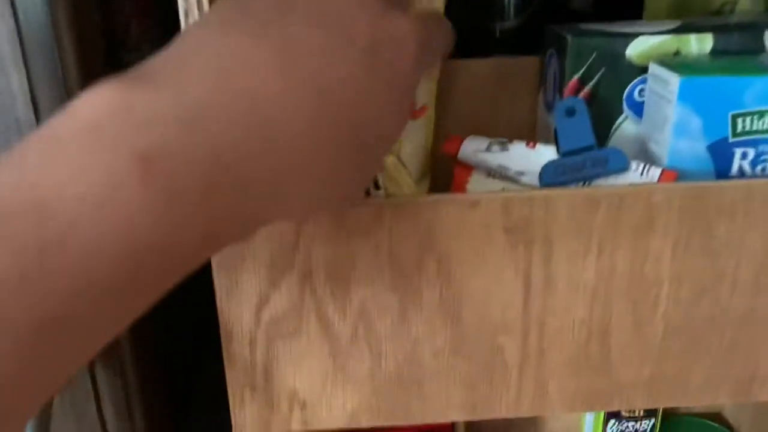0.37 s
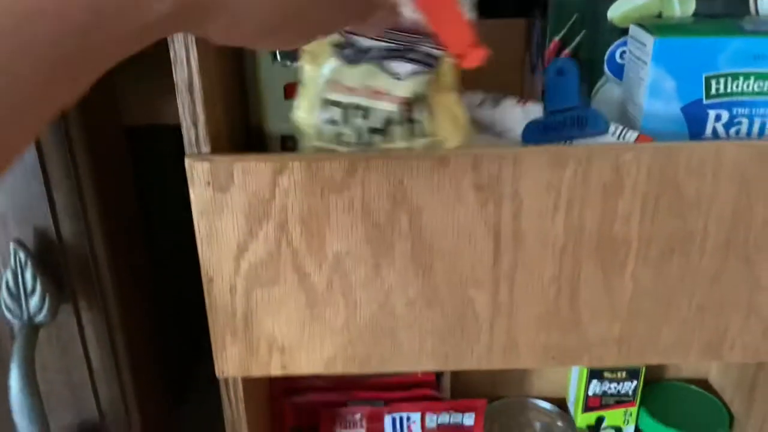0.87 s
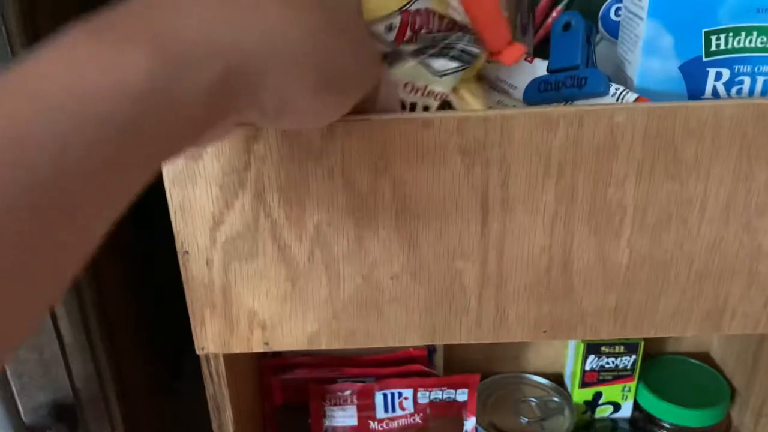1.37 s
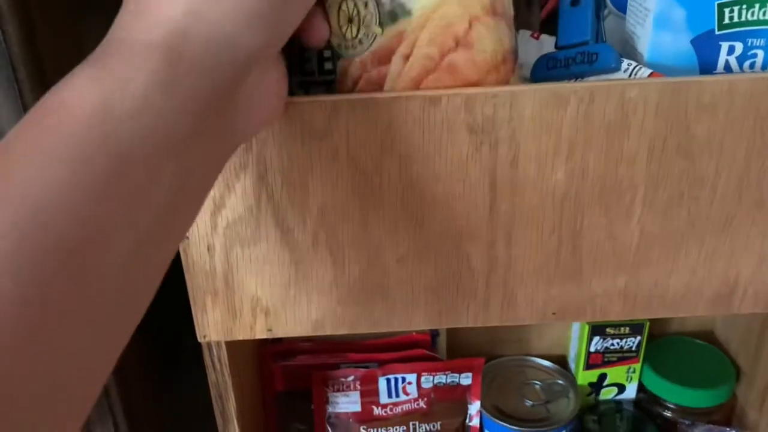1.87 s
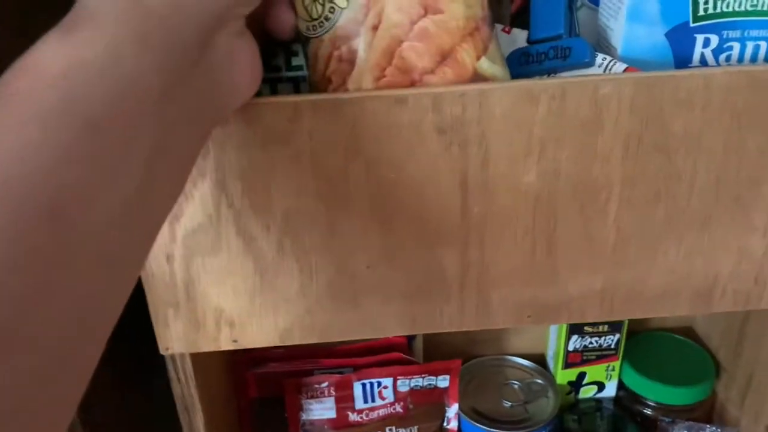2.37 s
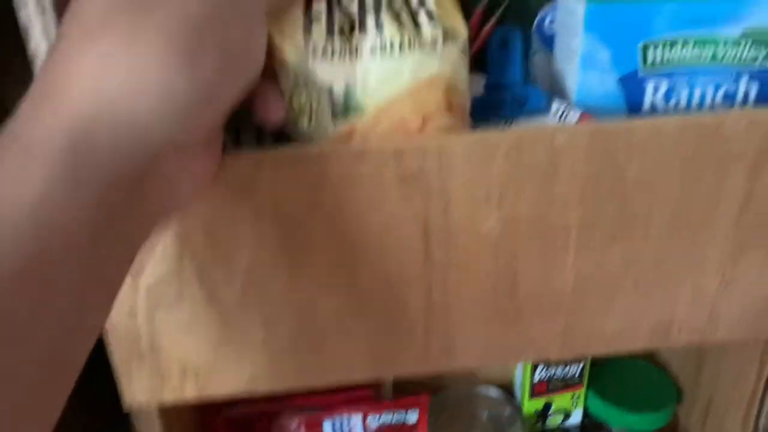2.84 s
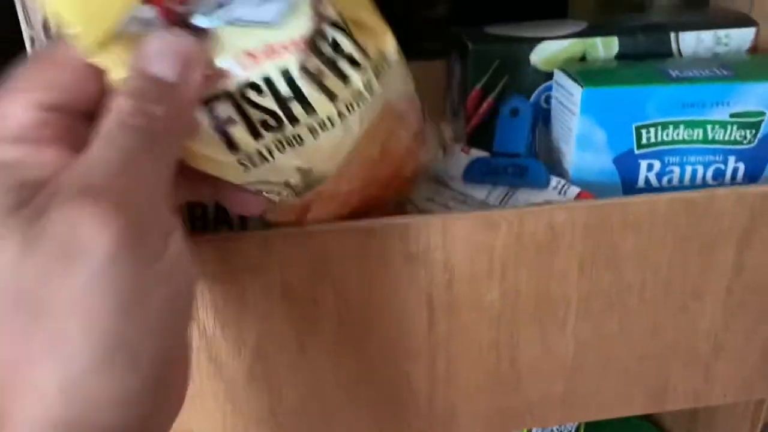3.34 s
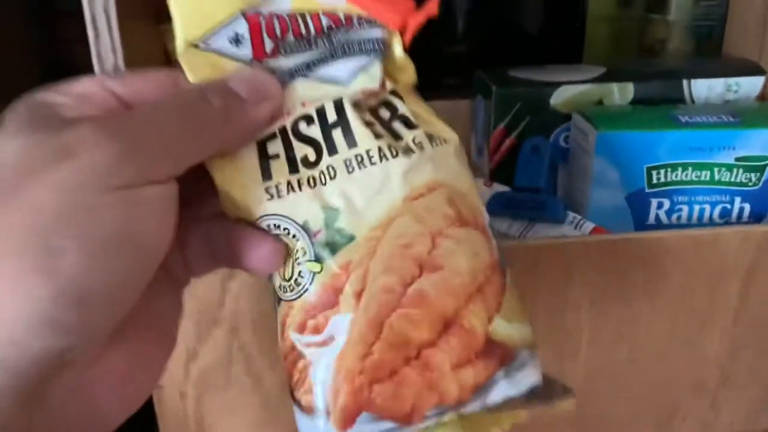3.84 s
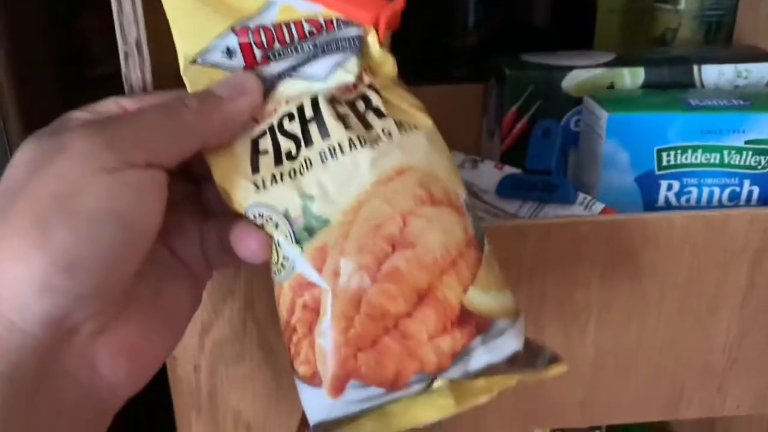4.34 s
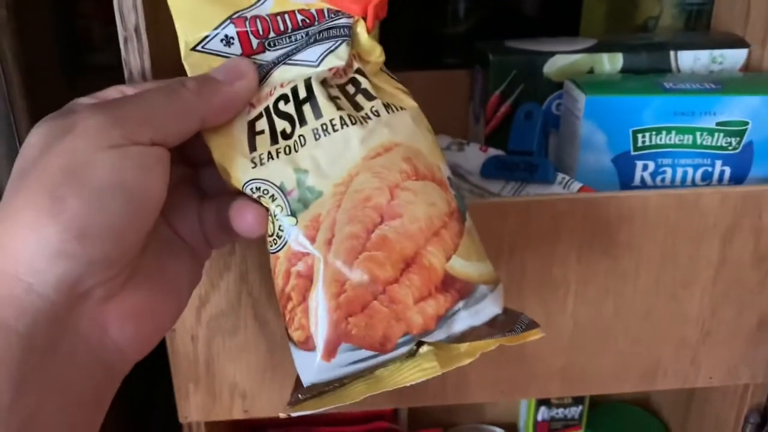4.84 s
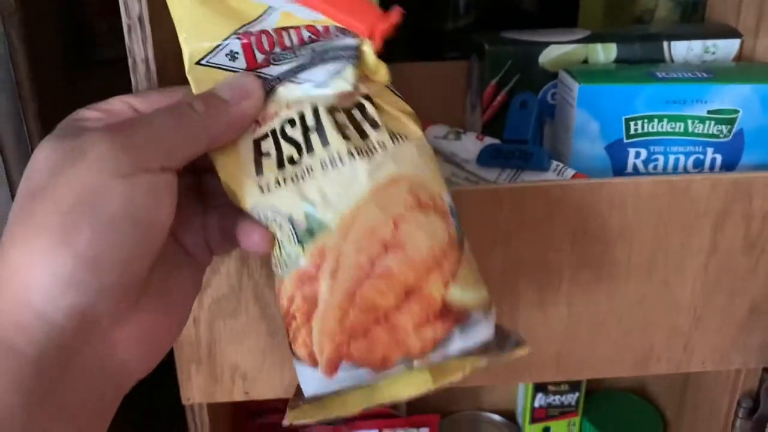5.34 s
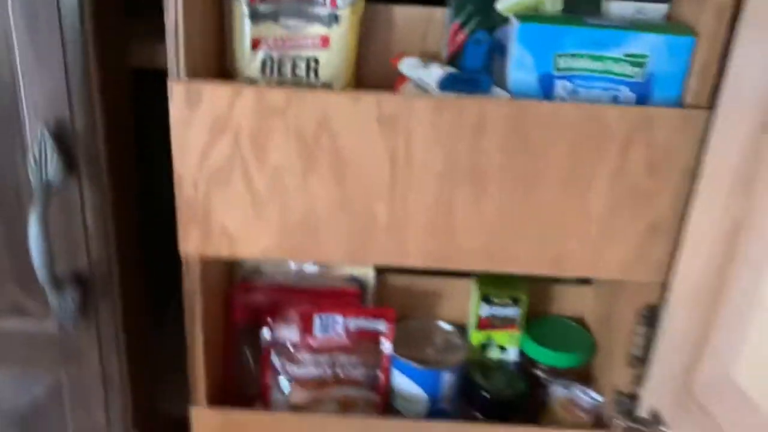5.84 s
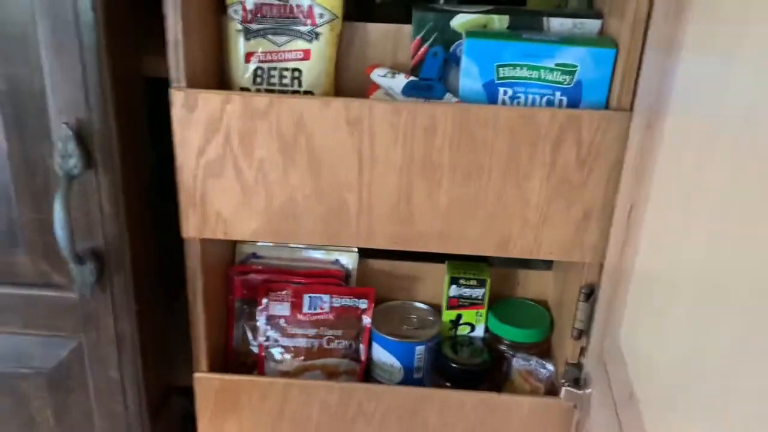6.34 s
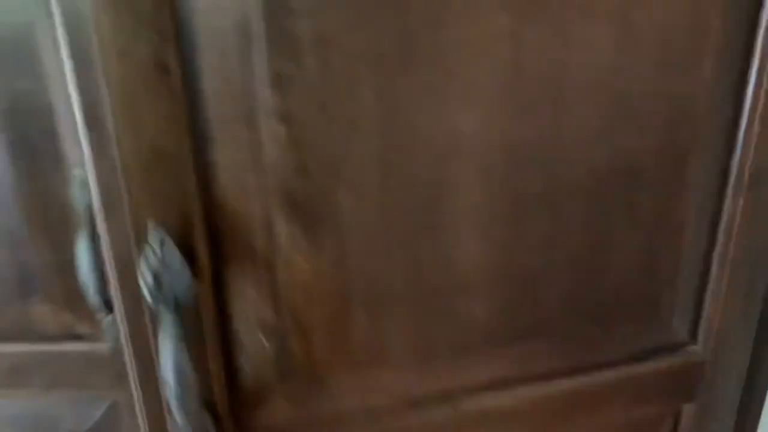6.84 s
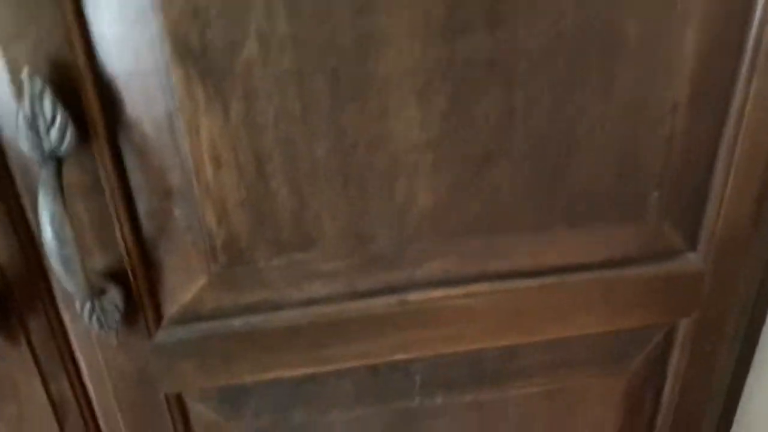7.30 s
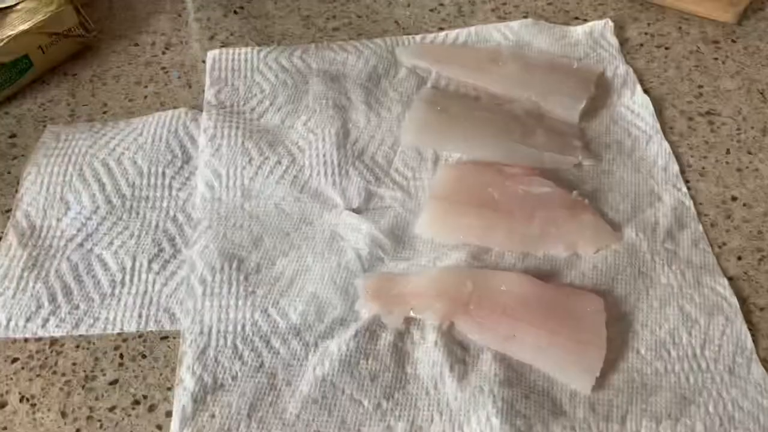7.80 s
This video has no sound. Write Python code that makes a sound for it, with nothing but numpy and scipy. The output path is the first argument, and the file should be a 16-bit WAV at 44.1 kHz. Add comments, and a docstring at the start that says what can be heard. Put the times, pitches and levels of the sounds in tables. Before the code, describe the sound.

Close stereo microphone in a small, fairly dry kitchen: dense bright crinkling of a filled packet with low hollow wood knocks and dull bumps, easing briefly, then resuming up to one loud clunk. The packet is held almost silently, rustles again as it is carried off, and a wooden door slams sharply, followed by faint handling and a drop in level.

```python
"""A hand pulls a stiff plastic food packet out of a wooden door rack in a home kitchen: the film crackles and snaps,
packet and boxes bump, and the hollow rack knocks and sways. The packet is lifted clear, turned and carried off.
Near the end the door catch rattles, the cupboard door bangs shut and shudders; last of all the level drops.
Film and wood are made from ringing clicks and shaped noise; two close microphone ports hear them."""
import sys
import numpy as np
from scipy import signal
from scipy.fft import rfft, irfft
from scipy.io import wavfile

SR = 44100
rng = np.random.default_rng(int(sys.argv[2]) if len(sys.argv) > 2 else 0)


def unload_audio(sound):
    """Save the sound as a 16-bit wav file, at the path given as the first command line argument."""
    columns = np.transpose(np.atleast_2d(sound))
    # keep every value between -1 and 1, then stretch to whole-number steps
    steps = np.round(np.clip(columns, -1, 1) * 32767)
    wavfile.write(sys.argv[1], SR, steps.astype(np.int16))


def amplitude_ratio(level_db):
    """Convert a level in decibels to the matching linear amplitude (field) ratio."""
    exponent = np.asarray(level_db, float) / 20
    return 10 ** exponent


N = 349983


def rms_one(x):
    """Scale a sound to an average (rms) strength of 1."""
    return x / np.sqrt(np.mean(x ** 2) + 1e-20)


def at_hz(points, hz):
    """Read a curve of (f/Hz, value) between its points, on a logarithmic pitch scale."""
    f, value = np.array(points).T
    return np.interp(np.log(hz + 1), np.log(f), value)


def colour(x, points):
    """Shape a steady signal by a dB spectrum."""
    gain = amplitude_ratio(at_hz(points, np.fft.rfftfreq(N, 1 / SR)))
    return irfft(rfft(x) * gain, N)


def drift(rate_hz):
    """Slow random wandering with spread 1, made by smoothing noise twice."""
    r = np.exp(-2 * np.pi * rate_hz / SR)
    settling = 9000   # samples thrown away while the filter starts up
    wander = signal.lfilter([1], [1, -2 * r, r * r], rng.standard_normal(N + settling))
    return rms_one(wander[settling:])


def ring(clicks, hz, t60):
    """Each unit click starts a sine of height 1 that dies by 60 dB in t60 seconds."""
    r, w = amplitude_ratio(-60 / (t60 * SR)), 2 * np.pi * hz / SR
    return signal.lfilter([0, np.sin(w)], [1, -2 * r * np.cos(w), r * r], clicks + 1e-18)


def band(x, low_hz, high_hz):
    """Keep only the pitches between two limits."""
    sos = signal.butter(2, [low_hz, min(high_hz, .45 * SR)], "band", fs=SR, output="sos")
    return signal.sosfilt(sos, x)


def add(out, s, piece):
    """Mix a piece into out, starting at s seconds."""
    i = max(round(s * SR), 0)
    out[i:i + len(piece)] += piece[:N - i]


def humps(peak_s, rise_s, fall_s, db):
    """Gain of humps that climb and drop 20 dB in the given times (signs ignored); their powers add."""
    since = np.arange(0, N + 64, 64) / SR - peak_s[:, None]
    rise, fall = np.abs(rise_s)[:, None], np.abs(fall_s)[:, None]
    away = np.where(since < 0, -since / rise, since / fall)
    gain = np.linalg.norm(amplitude_ratio(db[:, None] - 20 * away), axis=0)
    return np.interp(np.arange(N) / 64, np.arange(len(gain)), gain)


def grains(per_s, spread_db, low_hz, high_hz, cycles, clumps):
    """Tiny buckles at random moments, in clumps, each ringing one small facet for a few cycles."""
    sizes = amplitude_ratio(spread_db * np.minimum(rng.exponential(1, N), 5)) * rng.choice([-1, 1], N)
    clicks = sizes * (rng.random(N) < per_s * clumps / SR)
    facet = rng.integers(0, 12, N)
    pitches = np.geomspace(low_hz, high_hz, 12)
    return rms_one(sum(ring(clicks * (facet == k), hz, cycles / hz) for k, hz in enumerate(pitches)))


def bursts(events, cycles, width_octaves, broad_db, broad_ms, tail_db, tail_ms, low_hz, high_hz, rise_ms, firm):
    """Each event is a short ring round its own pitch plus a broad crack with a longer, weaker tail."""
    out, t = np.zeros(N), np.arange(2600) / SR
    ms = t * 1000
    for (s, db, hz), noise in zip(events, rng.standard_normal((len(events), 2, 2600))):
        blow = noise[0] * np.exp(-t * hz / cycles)
        blow[round(rise_ms * SR / 1000)] += firm   # the contact itself, against the scuffle round it
        tone = band(blow, hz * 2 ** -width_octaves, hz * 2 ** width_octaves)
        fade = amplitude_ratio(broad_db) * np.exp(-ms / broad_ms) + amplitude_ratio(tail_db) * np.exp(-ms / tail_ms)
        crack = band(noise[1] * fade, low_hz, high_hz)
        rise = (1 - np.exp(-ms / rise_ms)) * np.cos(np.pi / 2 * t / t[-1])   # and a smooth end
        add(out, s - rise_ms / 1000, amplitude_ratio(db) * rise * (tone / np.abs(tone).max() + crack))
    return out


def background():
    """Steady kitchen air and microphone hiss: noise given a fixed spectrum."""
    # spectrum of the air and hiss: f/Hz, relative level/dB
    floor = [(18, -28.5), (30, 19.5), (179, -3), (450, -28.5), (850, -17.5), (1400, -31.5), (4190, -23),
             (7270, -32), (8740, -54.5), (10800, -34), (16000, -65)]
    floor_db = -59.5   # overall rms level
    return amplitude_ratio(floor_db) * rms_one(colour(rng.standard_normal(N), floor))


def door():
    """Contacts of catch and frame strike the door's modes (own pitches); a shudder of noise bands follows."""
    # contacts of the door shutting: t/s, peak level/dB, centre f/Hz
    slam = [(6.956, -12.5, 2410), (6.962, -6, 4770), (6.963, -0.5, 2440), (6.967, -11, 338),
            (6.97, 0.5, 1930), (6.969, -13.5, 111.4), (6.979, -16.5, 158), (6.997, -8.5, 5140),
            (7.001, -13, 496), (7.01, -12, 930), (7.113, -21, 4970)]
    # pitches at which the door rings: f/Hz, level/dB before a common cut of 35 dB, time to die 60 dB/s
    modes = [(65.4, -5, 0.35), (90.4, -20, 0.8), (192, -12.5, 0.2), (266, -19.5, 0.35), (402, -20.5, 0.57),
             (540, -18, 0.2), (1028, -18.5, 0.22), (1340, -15, 0.1), (1930, -7, 0.075), (2530, -21.5, .15)]
    # shudder of door and cupboard contents: f/Hz, starting level/dB, time to die 60 dB/s
    shudder = [(70, -30, 1.3), (176, -24.5, 0.55), (400, -24.5, 0.42), (1039, -23, 0.63),
               (2300, -23.5, 0.41)]
    bang_s, rattle_db = 6.966, 2   # start of the shudder; its unevenness
    blows, t = np.zeros(N), np.arange(1800) / SR
    for (s, db, hz), noise in zip(slam, rng.standard_normal((len(slam), 1800))):
        noise[0] += 8.0   # the contact itself
        contact = band(noise * np.exp(-t / .003), hz / 1.8, hz * 1.8)
        add(blows, s, amplitude_ratio(db) * contact / np.abs(contact).max())
    out = blows + sum(amplitude_ratio(level_db - 35) * ring(blows, hz, t60) for hz, level_db, t60 in modes)
    since = np.arange(N) / SR - bang_s
    for hz, level_db, t60 in shudder:
        noise = rms_one(band(rng.standard_normal(N), hz / 1.6, hz * 1.6))
        fading_db = level_db + rattle_db * drift(12) - 60 * np.maximum(since, 0) / t60
        out += noise * (since > 0) * amplitude_ratio(fading_db)
    return out


def sway():
    """Rack, hand and steps heave and settle: a low rumble that swells and sinks."""
    # heaves: peak t/s, time to rise or settle 20 dB/s, level/dB
    heaves = [(0.0, 0.06, -42), (0.3, 0.5, -38), (1.2, 0.42, -42), (1.999, 0.28, -43.5), (2.789, 0.13, -49),
              (3.8, 0.65, -41.5), (4.2, 0.12, -44), (5.95, 0.15, -42.5), (7.199, 0.53, -43)]
    still_db = -72   # always present
    s, settle, db = np.transpose(heaves)
    rumble = rms_one(band(rng.standard_normal(N), 50, 260)) * amplitude_ratio(2.0 * drift(12))
    return (humps(s, settle, settle, db) + amplitude_ratio(still_db)) * rumble


def rack():
    """Each knock swells through three resonances of the hollow and sets the wood ringing, never quite alike."""
    # the rack knocking on its door: t/s, level/dB, base pitch of the hollow f/Hz
    knocks = [(0.111, -14.5, 450), (0.247, -11, 440), (0.358, -12, 432), (0.648, -27.5, 400),
              (0.871, -18, 413), (1.317, -28.5, 420), (1.538, -32.5, 374), (1.651, -15.5, 440),
              (1.725, -23.5, 400), (3.28, -23.5, 400), (3.306, -23.5, 403), (3.689, -6.5, 447),
              (3.889, -24.5, 426), (4.045, -32, 399), (4.121, -23.5, 415), (4.238, -30.5, 411),
              (4.314, -39.5, 416)]
    # pitches at which the wood rings: f/Hz, relative level/dB, time to die 60 dB/s
    wood = [(76, -18, 0.45), (188, -7, 0.088), (803.8, -13, 0.2)]
    scuffle_db, scuffle_t60_s, scratch_db = -27, 0.08, 21   # uneven contact after each blow; gain of its own sound
    hollow_t60_s, longer_per_db = 0.015, 0.09   # the hollow rings longer after a gentle blow
    upper_ratio, upper_db = 1.35, -10.5   # a second, higher air mode
    wood_per_db = 0.5   # hard blows wake the wood more than the hollow
    length = SR // 2
    out, click = np.zeros(N), np.eye(1, length)[0]
    modes = np.array([amplitude_ratio(db) * band(ring(click, hz, t60), hz / 1.25, hz * 1.4) for hz, db, t60 in wood])
    scuffle_gain = amplitude_ratio(scuffle_db - 60 * np.arange(length) / SR / scuffle_t60_s)
    for s, db, hz in knocks:
        scuffle = rng.standard_normal(length) * scuffle_gain
        last_t60 = hollow_t60_s * (1 - longer_per_db * db)   # the last stage is lower and lingers

        def swell(f):
            first = ring(click + scuffle, f * 1.12, hollow_t60_s)
            second = ring(first, f * 1.03, hollow_t60_s)
            return ring(second, f * .95, last_t60)

        low, high = swell(hz), swell(hz * upper_ratio)
        hollow = low / low.max() + amplitude_ratio(upper_db) * high / high.max()
        scratch = amplitude_ratio(scratch_db) * band(scuffle, 550, 1900)
        chance_db = 3.5 * rng.standard_normal(len(wood))
        ringing = amplitude_ratio(chance_db + wood_per_db * db) @ modes
        add(out, s - .006, amplitude_ratio(db) * (hollow + scratch + ringing))
    return out


def thuds():
    """Dull heavy contacts: very short, wide rings with little crack."""
    # contacts: t/s, level/dB, centre f/Hz
    contacts = [(0.457, -23.5, 412), (1.125, -27.5, 357), (1.212, -18.5, 400), (2.78, -36, 114),
                (3.595, -22, 136), (5.903, -31.5, 136), (6.12, -29, 1040), (6.548, -36.5, 536),
                (7.308, -29.5, 265)]
    return bursts(contacts, 1.8, 0.54, broad_db=-13, broad_ms=8.0, tail_db=-23.5, tail_ms=30.0,
                  low_hz=90, high_hz=1400, rise_ms=3.1, firm=4.9)


def bumps():
    """The packet bumps boxes and wood: short middle-pitched rings with a dull scatter of noise."""
    # bumps: t/s, level/dB, centre f/Hz
    contacts = [(0.221, -17.5, 1210), (0.29, -16.5, 1170), (0.955, -20, 1250), (1.043, -23.5, 1670),
                (1.182, -15, 1060), (1.611, -24, 1680), (1.931, -16, 1250), (1.948, -13, 1040),
                (2.027, -11.5, 1410), (2.042, -13.5, 1010), (2.085, -23.5, 740), (2.117, -17, 1190),
                (2.475, -35, 592), (2.476, -26.5, 1440), (2.638, -38, 600), (2.646, -31.5, 1070),
                (2.83, -30, 800), (2.855, -33.5, 850), (2.969, -21, 830), (3.055, -17.5, 2150),
                (3.074, -20, 2130), (3.252, -14, 810), (3.272, -19.5, 1122), (3.431, -30, 656),
                (3.565, -21.5, 1110), (3.585, -10.5, 1100), (3.689, -12, 875), (5.652, -23, 1620),
                (5.832, -23, 1070), (5.969, -17, 1710), (7.635, -44, 853), (7.801, -34.5, 1220)]
    return bursts(contacts, 7.3, 0.25, broad_db=-5.0, broad_ms=9.5, tail_db=-14, tail_ms=30.0,
                  low_hz=230, high_hz=2000, rise_ms=2.2, firm=6.0)


def snaps():
    """Creases in the film snap over: a sharp ring with a bright, very brief crack."""
    # snapping creases: t/s, level/dB, centre f/Hz
    creases = [(0.2364, -17, 6760), (0.2892, -16.5, 4930), (0.401, -20, 6560), (0.4233, -20, 4900),
               (0.5067, -24.5, 4430), (0.5889, -22, 6500), (0.627, -14, 4460), (0.853, -20, 11200),
               (0.8869, -17, 7700), (0.9393, -11.5, 10400), (1.071, -17.5, 7200), (1.1169, -19, 10300),
               (1.158, -16.5, 11000), (1.2186, -18, 4100), (1.5838, -18, 10600), (1.7744, -16, 4470),
               (1.8587, -6.5, 6140), (1.8966, -17, 4030), (1.933, -19.5, 3260), (2.2109, -33.5, 10700),
               (2.6449, -30.5, 2530), (2.9342, -25.5, 10000), (3.0545, -28, 4630), (3.0739, -7, 9400),
               (3.25, -18, 4370), (3.2829, -24, 4770), (3.3024, -14, 7500), (3.4361, -18.5, 7730),
               (3.5663, -25, 4650), (3.5872, -2.5, 3930), (3.907, -31, 6900), (3.989, -35, 10000),
               (3.9973, -25.5, 6600), (4.1046, -30, 6900), (4.146, -30, 11000), (4.159, -33, 10500),
               (4.3061, -31.5, 10200), (4.4044, -35, 9630), (4.4853, -36.5, 10240), (4.9236, -46.5, 10130),
               (5.3797, -28.5, 10750), (5.5603, -24.5, 10500), (5.6126, -24.5, 7100), (5.6501, -22, 11100),
               (5.661, -15, 4400), (5.688, -18.5, 2660), (5.8321, -23.5, 3470), (5.9663, -22.5, 3950),
               (5.99, -38, 7100), (6.4467, -24.5, 4600), (6.63, -26.5, 3500), (7.3489, -40.5, 8940),
               (7.8004, -38, 3420)]
    return bursts(creases, 5.0, 0.25, broad_db=1.0, broad_ms=.55, tail_db=-13, tail_ms=7.0,
                  low_hz=1000, high_hz=15000, rise_ms=.35, firm=4.0)


def movements():
    """Gains of film and body (a changing grip plus grabs and squeezes), and the share of creasing."""
    # hand on packet and door: t/s, grip level/dB, creasing rather than sliding/0-1
    grip = [(0.2, -74, 0.7), (0.23, -43, 0.84), (2.02, -39, 0.8), (2.25, -68.5, .8), (2.42, -96, 0.9),
            (2.9, -50, .82), (3.7, -41.5, .84), (3.88, -60, 1), (4.3, -66, 1), (4.75, -78.5, 1),
            (5.34, -82.5, 0.8), (5.39, -56, 1), (5.62, -47, 0.95), (5.95, -41.5, 0.6), (6.17, -58.5, .1),
            (6.59, -56, 0.13), (6.68, -50, 0.2), (6.93, -42.5, 0.3), (7.24, -45, .3), (7.45, -55, 0.7),
            (7.79, -83, 0.7)]
    # sudden grabs and taps: t/s, time to die 20 dB/s (sign ignored), film level/dB, body level/dB
    grabs = [(0.0, -2.4, -67, -52), (0.231, 0.59, -43, -34.5), (0.934, 0.02, -28.5, -50),
             (2.037, -0.03, -56.5, -32), (2.479, 0.06, -52, -55.5), (2.643, 0.08, -70, -43),
             (2.958, 0.44, -50.5, -46.5), (3.428, 0.2244, -43.5, -47), (4.587, 0.07, -56, -51.5),
             (6.617, 0.36, -76.5, -41), (6.685, 0.43, -41, -39.5)]
    # squeezes and strokes: peak t/s, time to swell 20 dB/s (sign ignored), film level/dB, body level/dB
    squeezes = [(0.548, 0.08, -34, -34), (0.619, 0.34, -33, -36.5), (1.165, 0.33, -33.5, -40.5),
                (1.4, 0.47, -37, -44.5), (1.898, 0.23, -42, -41), (2.8, 0.07, -37.5, -37),
                (3.074, 0.2, -39.5, -44), (3.27, 0.11, -32, -30.5), (3.719, 0.1, -46.5, -47),
                (4.13, 0.61, -60.5, -61), (5.269, -0.1, -79.5, -59.5), (5.996, 0.04, -40, -32.5),
                (6.292, -0.18, -48, -44.5), (6.346, 0.14, -36.5, -37.5), (7.781, 0.22, -69.5, -57)]
    slide_dulls_db, grip_body_db = -17.5, -15   # film lost in pure sliding; body lost in pure creasing
    grab_rise_s, fade_per_swell = 0.0092, 0.83   # 20 dB rise of a grab; fading time against swelling time
    t, grip_db, crisp = np.transpose(grip)
    grip_db, crisp = [np.interp(np.arange(N) / SR, t, column) for column in (grip_db, crisp)]
    crisp = np.clip(crisp, 0, 1)
    grab_s, die, *grab_db = np.transpose(grabs)
    peak_s, swell, *squeeze_db = np.transpose(squeezes)

    def together(grip_level, grab_level, squeeze_level):
        grabbed = humps(grab_s, np.full_like(die, grab_rise_s), die, grab_level)
        squeezed = humps(peak_s, swell, fade_per_swell * swell, squeeze_level)
        return np.sqrt(amplitude_ratio(grip_level) ** 2 + grabbed ** 2 + squeezed ** 2)

    film = together(grip_db + slide_dulls_db * (1 - crisp), grab_db[0], squeeze_db[0])
    body = together(grip_db + grip_body_db * crisp, grab_db[1], squeeze_db[1])
    return film, body, crisp


def handling():
    """Film and filled body crackle when creased and swish when sliding; the same finger movements clump both."""
    # sound of sliding against creasing: f/Hz, relative level/dB
    swish = [(1000, -0.5), (4800, 0.5), (6500, -4.5), (10200, -0.5), (15700, 2)]
    # spectrum of the film: f/Hz, relative level/dB
    film_shape = [(500, -11), (2500, -12), (4700, -5.5), (6500, -6), (10000, -2), (13000, -8.5),
                  (15700, -9), (16800, -38.5)]
    # what a sliding hand sets singing in the wood: f/Hz, level against the body/dB
    rub_modes = [(700, -10.5), (1020, -9), (1700, -10.5), (4680, -13)]
    rub_t60_s = 0.039
    jostle_db, leaves_rack_s = -3.5, 3.75   # the packet jostles the hollow rack until it is lifted clear
    film_gain, body_gain, crisp = movements()
    creasing, sliding = np.sqrt(crisp), np.sqrt(1 - crisp)
    clumps = amplitude_ratio(6.8 * drift(30))

    crackle = creasing * grains(4000, 5.6, 1400, 19000, 1.7, clumps)
    crackle += sliding * rms_one(colour(rng.standard_normal(N), swish))
    fits = amplitude_ratio(2.2 * drift(20))   # creases give way in fits and starts
    film = rms_one(fits * colour(crackle, film_shape))

    rustle = creasing * grains(900, 4.2, 515, 4500, 4.0, clumps) + sliding * rng.standard_normal(N)
    body = rms_one(fits * band(rustle, 860, 4500))

    stroke = rng.standard_normal(N)
    rub = sliding * sum(amplitude_ratio(level_db + 4.0 * drift(6)) * rms_one(ring(stroke, hz, rub_t60_s))
                        for hz, level_db in rub_modes)

    jostle = rms_one(band(grains(300, 2.5, 330, 430, 9.8, clumps), 250, 600))
    jostle *= np.arange(N) < leaves_rack_s * SR
    return film_gain * film + body_gain * (body + rub + amplitude_ratio(jostle_db) * jostle)


def kitchen(x):
    """The room's reflections: a dull dying tail, unrelated in the two ports."""
    kitchen_t60_s, kitchen_db = 0.26, -15
    t = np.arange(SR // 2) / SR
    tail = band(rng.standard_normal((2, SR // 2)), 480, 6200) * amplitude_ratio(-60 * t / kitchen_t60_s) * (t > .006)
    tail = amplitude_ratio(kitchen_db) * tail / np.sqrt(np.mean(np.sum(tail ** 2, axis=1)))
    return signal.fftconvolve(x[None], tail, axes=1)[:, :N]


def ports(x):
    """Both ports get the direct sound, the treble with a fixed lag, plus close reflections of their own."""
    # share of the sound's power that reaches both ports alike: f/Hz, share/0-1
    alike_points = [(60, 0.85), (150, 0.45), (300, 0.95), (520, 0.97), (800, 0.18), (5000, 0.06),
                    (7800, 0.985), (16000, .99)]
    port_lag_s, in_phase_hz = 1 / 4800, 6200   # the lag acts above this pitch
    cupboard_t60_s = 0.046
    hop, size = 2048, 8192
    hz, t = np.fft.rfftfreq(size, 1 / SR), np.arange(hop) / SR
    alike = np.clip(at_hz(alike_points, hz), 0, 1)
    turn = np.pi * port_lag_s * np.maximum(hz - in_phase_hz, 0) * np.array([[-1], [1]])
    margin = np.exp(-2j * np.pi * hz * hop / SR)   # one hop of room for the lag, taken off below
    direct = np.sqrt(alike) * np.exp(1j * turn) * margin
    padded, out = np.pad(x, (hop, 3 * hop)), np.zeros((2, N + 3 * size))
    window = signal.windows.hann(2 * hop, sym=False)
    for i in range(0, N + hop, hop):   # close reflections are drawn afresh every hop, so no fixed colour stands out
        near = rng.standard_normal((2, hop)) * amplitude_ratio(-60 * t / cupboard_t60_s)
        near[[0, 1], rng.integers(0, 24, 2)] += 14.0   # a strong first arrival with a random lag
        near = rfft(near / np.sqrt(np.mean(np.sum(near ** 2, axis=1))), size)
        piece = rfft(padded[i:i + 2 * hop] * window, size)
        out[:, i:i + size] += irfft(piece * (direct + np.sqrt(1 - alike) * near * margin), size)
    return out[:, 2 * hop:2 * hop + N]


def scene():
    """All sources sound together, reach the two ports directly and by way of the room, and sink at the end."""
    quiet_from_s, quiet_db = 7.82, -14
    dry = background() + door() + sway() + rack() + thuds() + bumps() + snaps() + handling()
    sink = np.clip((np.arange(N) / SR - quiet_from_s) / 0.013, 0, 1)
    balance = amplitude_ratio([[.4], [-.4]])   # the first port is slightly louder
    return (ports(dry) + kitchen(dry)) * amplitude_ratio(quiet_db * sink) * balance


def top_cut(x):
    """Nothing passes above the cut-off."""
    return signal.sosfilt(signal.butter(12, 17150, fs=SR, output="sos"), x)


def record(dry):
    """The deepest bass is cut, the loudest peaks are rounded, then the top is cut."""
    top_hz = 16600
    cut = signal.sosfilt(signal.butter(3, 48, "high", fs=SR, output="sos"), dry)
    rounded = 1.083 * np.tanh(cut / 1.018)
    finished = signal.sosfilt(signal.cheby2(10, 28, top_hz, fs=SR, output="sos"), rounded)
    return top_cut(finished)


dry = scene()
out = record(dry)
unload_audio(out)
```